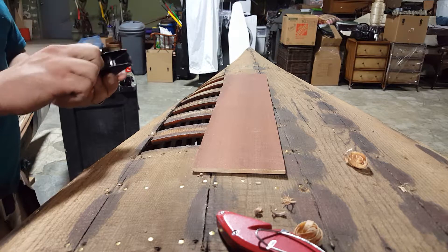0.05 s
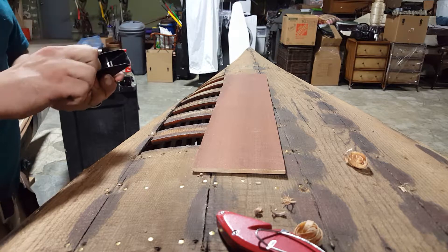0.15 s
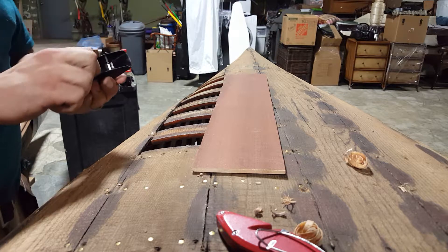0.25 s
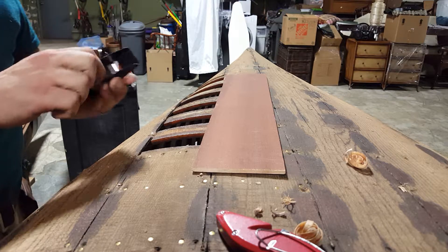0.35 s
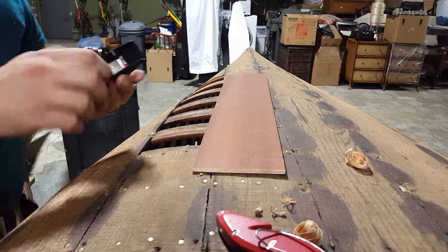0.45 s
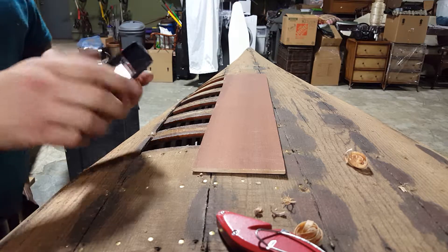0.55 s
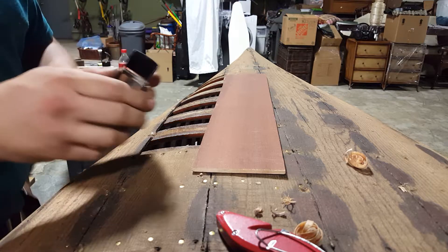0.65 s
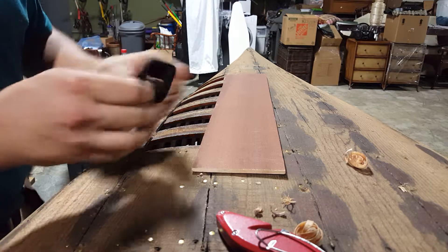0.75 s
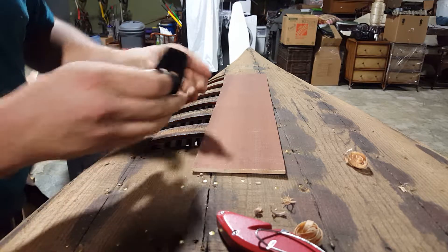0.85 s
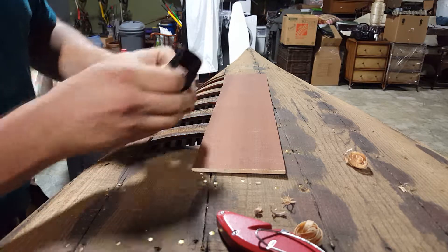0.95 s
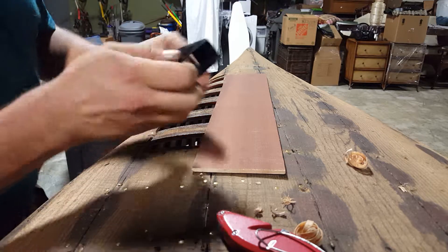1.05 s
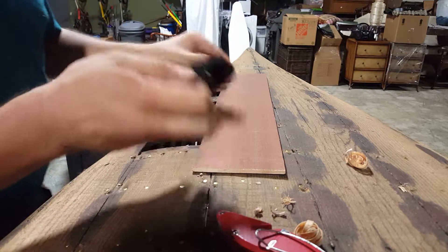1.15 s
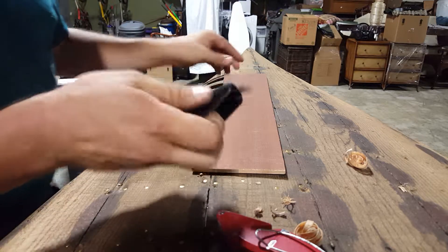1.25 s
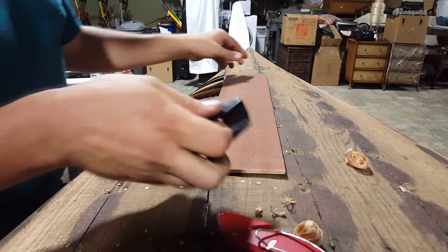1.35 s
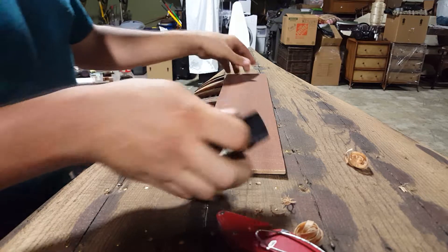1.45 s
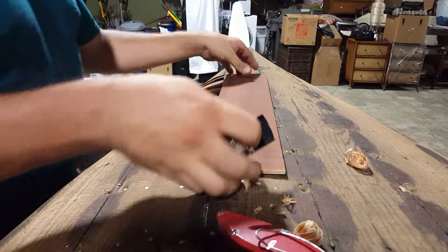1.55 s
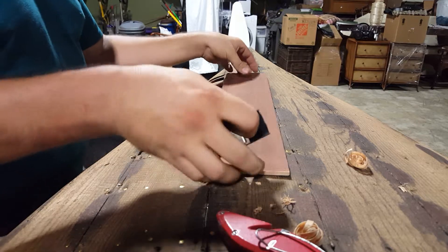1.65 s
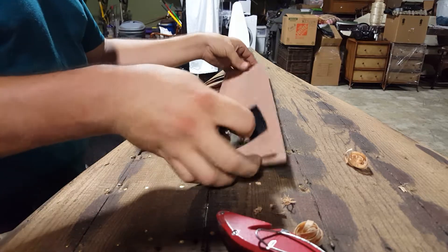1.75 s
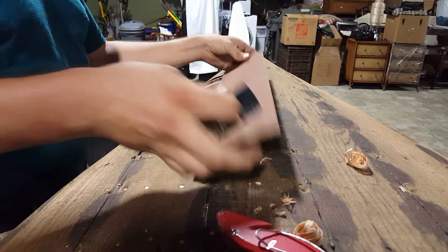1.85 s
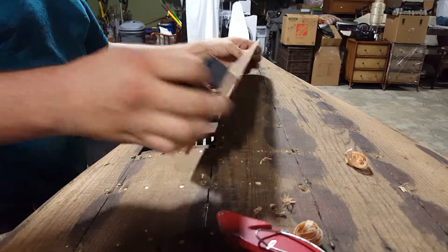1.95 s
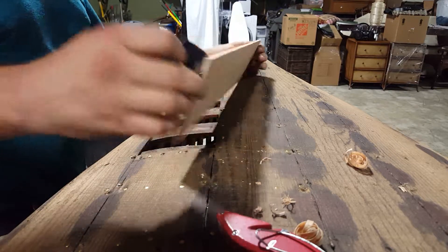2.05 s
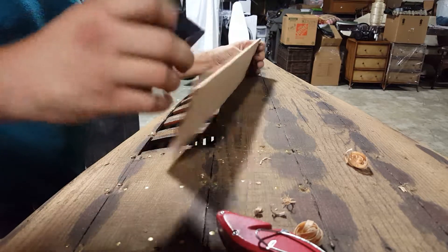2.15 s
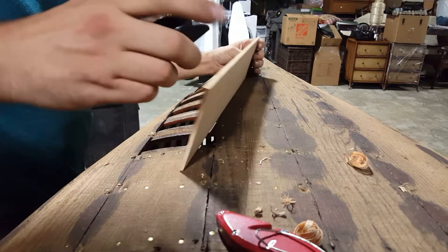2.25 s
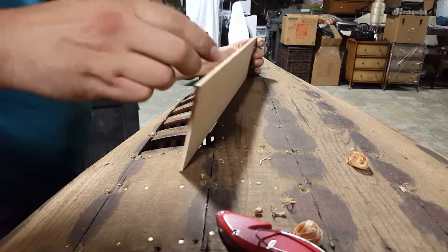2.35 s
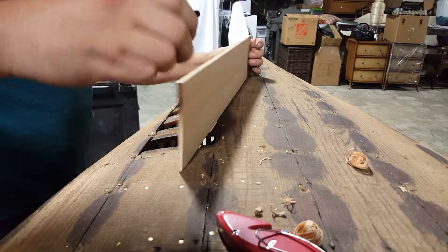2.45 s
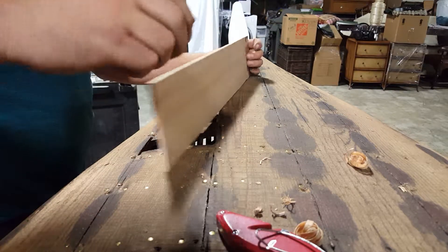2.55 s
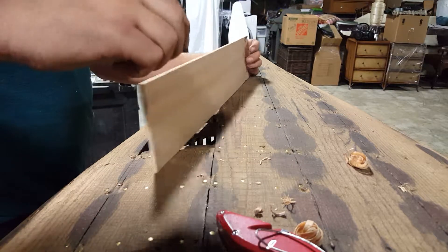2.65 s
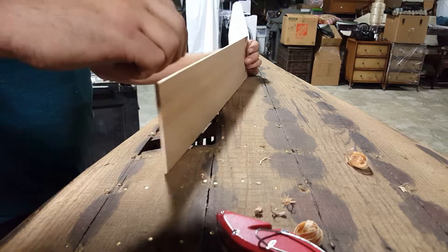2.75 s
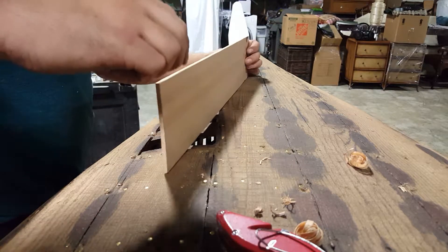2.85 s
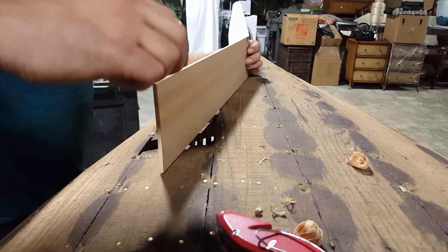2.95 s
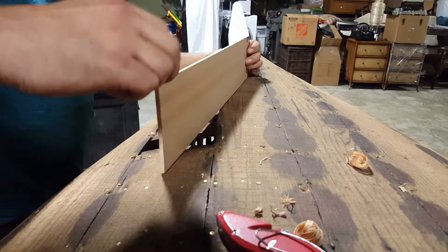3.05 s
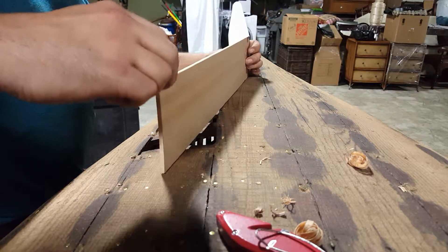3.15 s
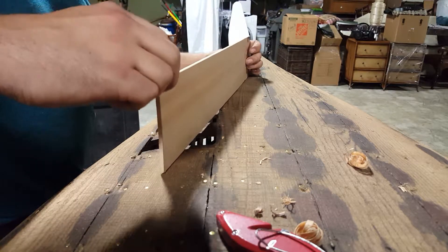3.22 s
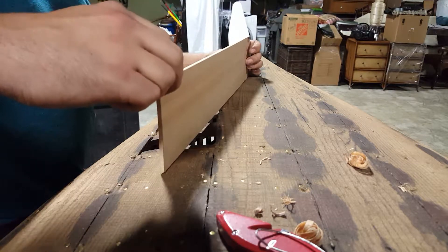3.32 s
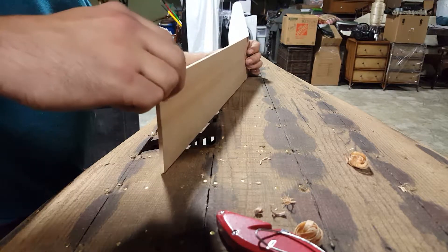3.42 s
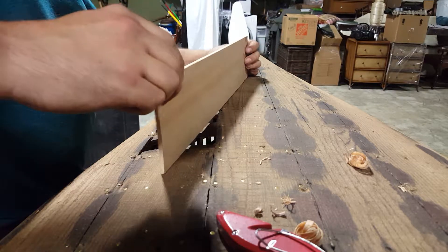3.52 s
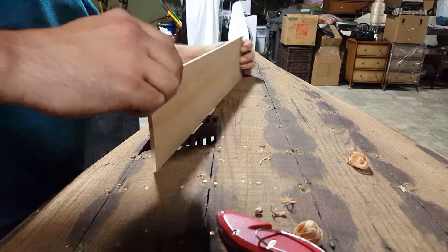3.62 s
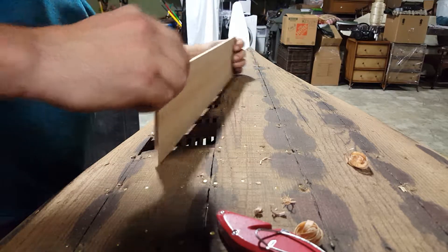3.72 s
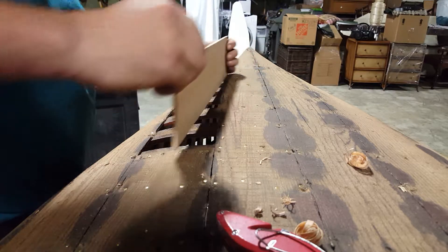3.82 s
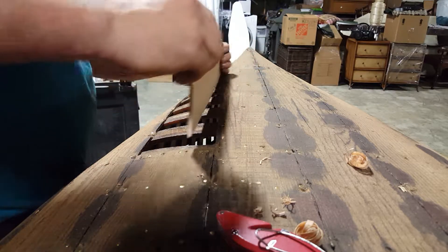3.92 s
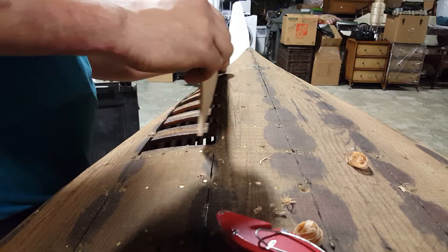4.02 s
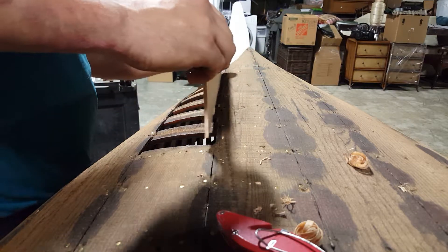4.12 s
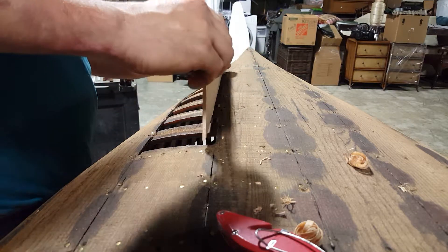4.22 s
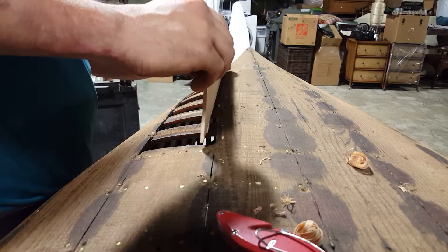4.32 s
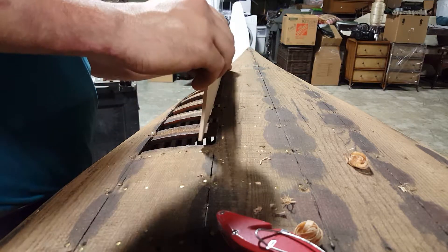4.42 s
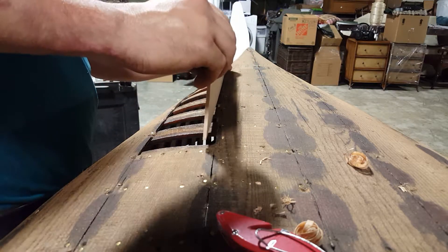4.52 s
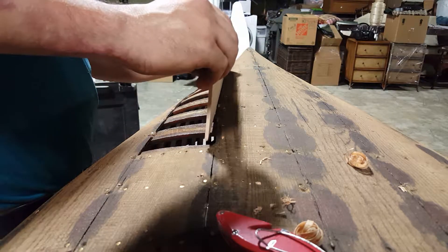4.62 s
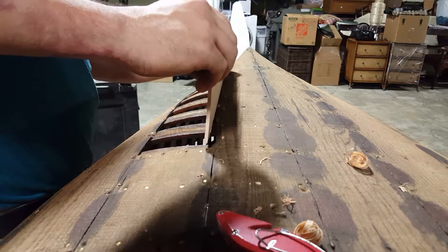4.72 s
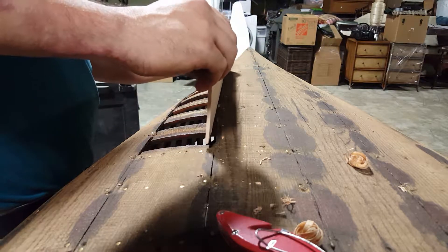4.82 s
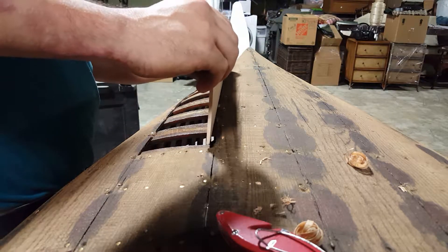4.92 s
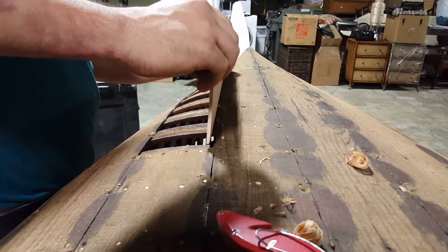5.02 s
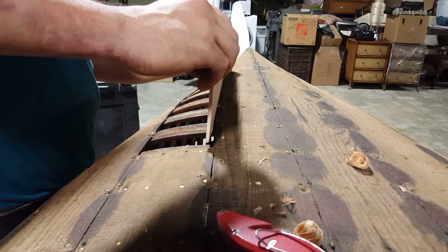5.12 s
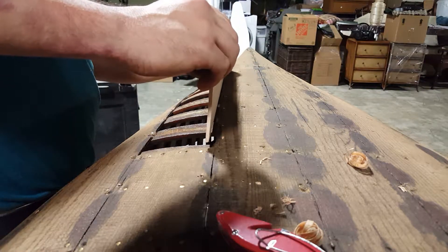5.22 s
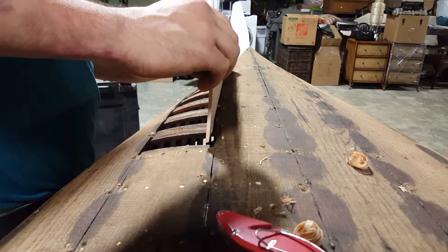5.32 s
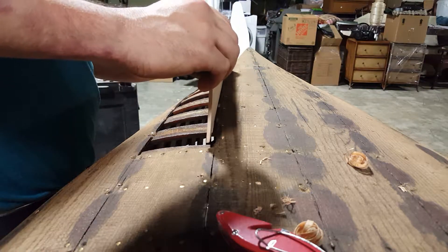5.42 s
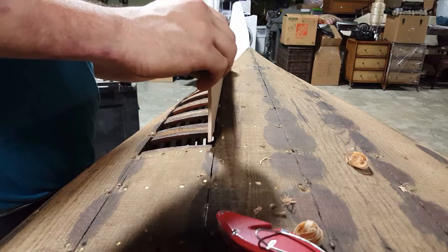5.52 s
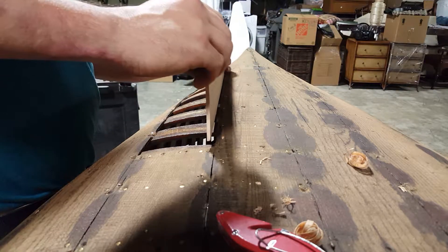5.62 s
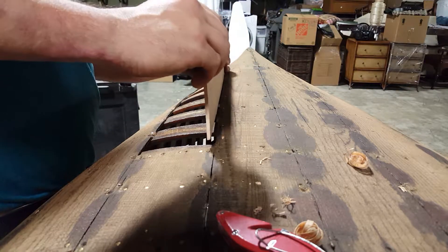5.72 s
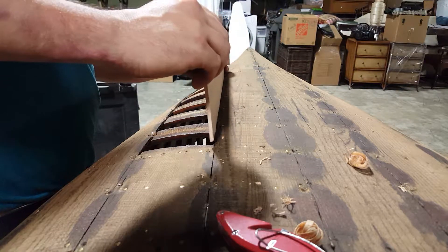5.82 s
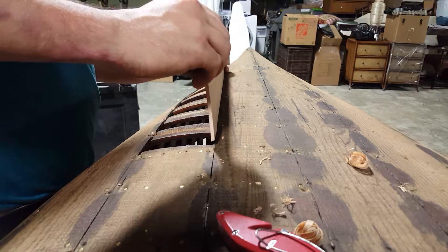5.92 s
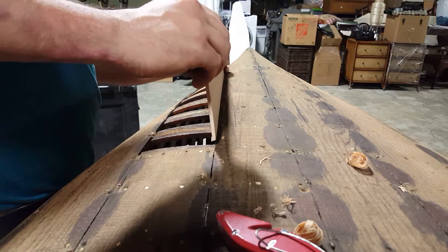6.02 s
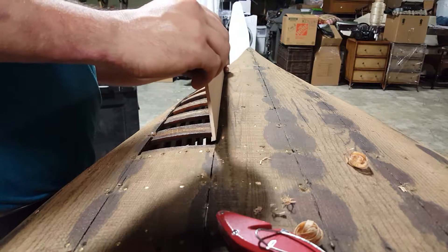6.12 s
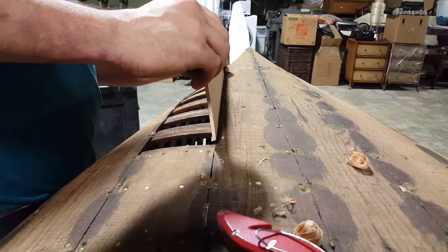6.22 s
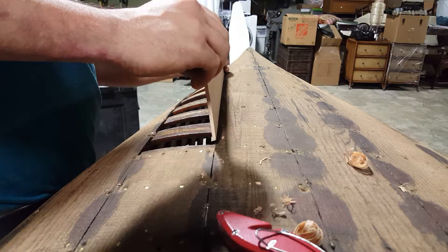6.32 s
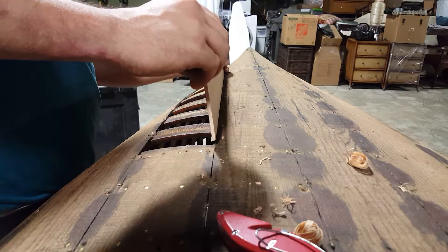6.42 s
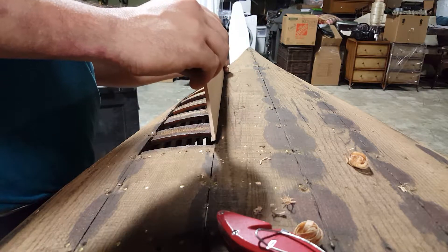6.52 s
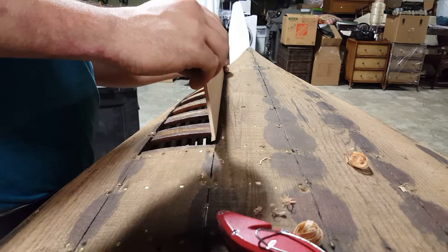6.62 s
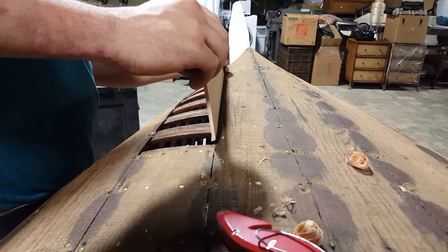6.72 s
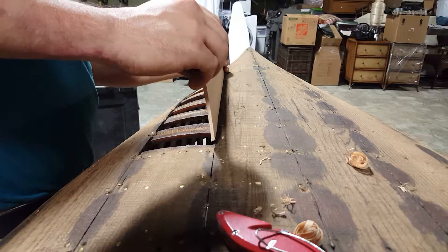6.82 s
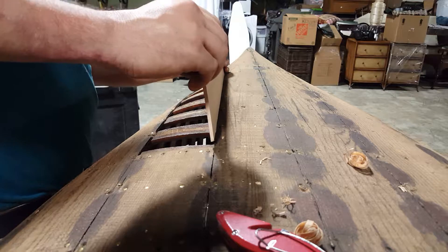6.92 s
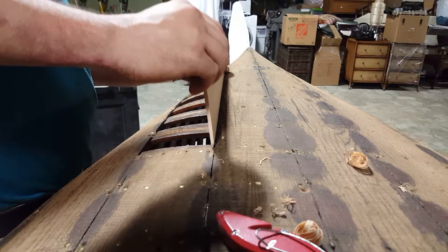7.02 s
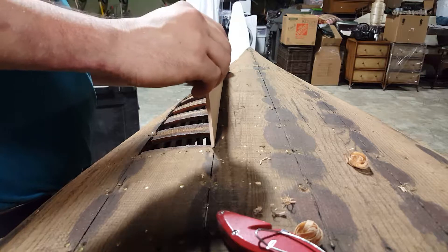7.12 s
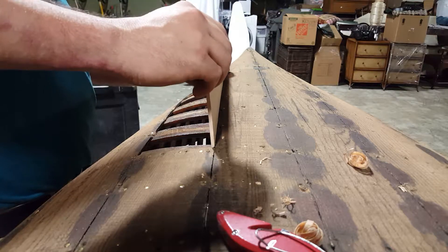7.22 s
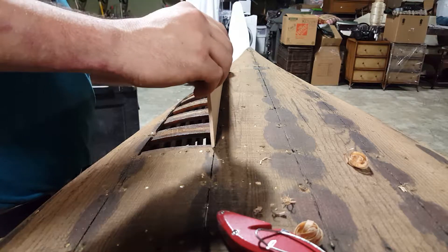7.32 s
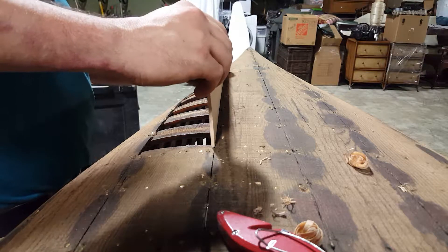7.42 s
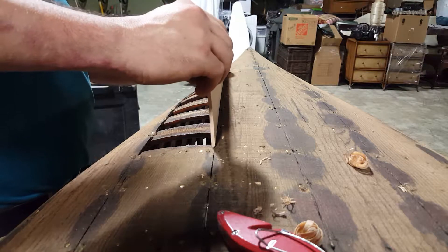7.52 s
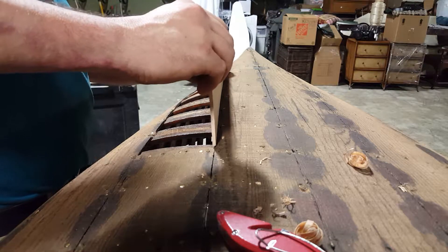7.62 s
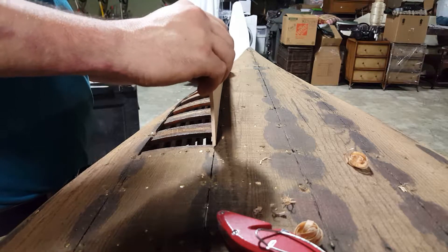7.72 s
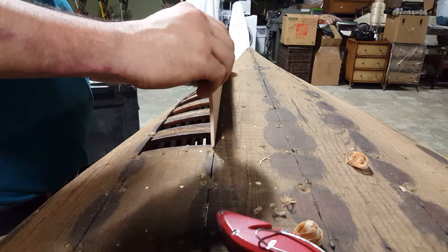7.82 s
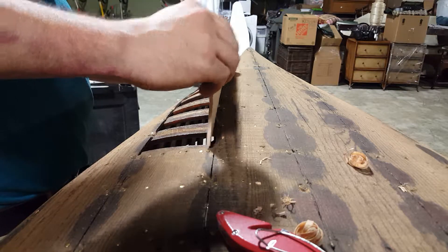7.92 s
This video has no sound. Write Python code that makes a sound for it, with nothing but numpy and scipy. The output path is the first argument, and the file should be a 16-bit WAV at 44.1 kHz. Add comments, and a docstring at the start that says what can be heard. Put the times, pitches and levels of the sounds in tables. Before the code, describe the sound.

Low room rumble and faint hiss in a workshop. A small metal tool chinks briefly, then a thin plank taps and rubs on an upturned wooden hull. Its corner snaps sharply, followed at once by a loud hollow double thump. Short scrapes and knocks follow as it is shuffled on edge, then long quiet gaps and a final hard clack. Close stereo microphone, short room echoes.

```python
"""In the soft rumble and hiss of a quiet workshop, a small metal tool in one hand chinks first.
Then a thin plank knocks and scrapes on an upturned wooden boat hull, and its corner snaps free as it is lifted.
It is stood on its edge and shuffled into place, and a sharp clack comes last.
Every knock and scrape drives the same wood: the hollow hull booms, the plank rings, its edge rasps
and the fibres hiss. The tool and the wood are heard with the echoes of the room."""
import sys
import numpy as np
from scipy import signal
from scipy.fft import rfft, irfft
from scipy.io import wavfile

SR = 44100
rng = np.random.default_rng(int(sys.argv[2]) if len(sys.argv) > 2 else 0)


def wrap_up_sound(samples):
    """Save the sound to the file named by the first command line argument, as 16-bit audio."""
    columns = np.atleast_2d(samples).T
    # keep every value between -1 and 1, then stretch to whole-number steps
    tamed = np.clip(columns, -1, 1)
    steps = np.round(tamed * 32767).astype(np.int16)
    wavfile.write(sys.argv[1], SR, steps)


N = 351036  # length of the scene in samples

# In all tables of ringing parts, level_db is relative and ring_s is the time to die away by 60 dB.
# still air of the shop, its balance of pitches: pitch_hz, relative level_db (per Hz)
AIR_SPECTRUM = [(25, -24.5), (40, -19.5), (58, -4.5), (92, -11.5), (120, -4), (145, -6.5), (180, -1),
                (255, -12), (335, -10), (440, -13.5), (590, -19.5), (780, -19.5), (1150, -24.5),
                (2000, -24.5), (4000, -34), (8000, -39.5), (11000, -41.5), (15000, -37.5)]
# how loud the still air is over time: time_s, rumble_db, hiss_db
AIR_LOUDNESS = [(0, -64, -71.5), (1.4, -63, -70), (3.1, -61, -71.5), (4.8, -60.5, -69.5), (7.96, -59, -71)]
AIR_SPLIT_HZ = 1036  # rumble below, hiss above
# sound from all sides, how alike left and right are: pitch_hz, likeness (1 = same, 0 = unrelated)
LEFT_RIGHT_LIKENESS = [(50, .75), (200, 0.73), (450, .65), (900, 0.062), (1600, 0.054), (3000, 0),
                       (15000, -0.25)]

# the metal tool: pitch_hz, level_db, ring_s
TOOL_MODES = [(2170, 4.5, 0.035), (2620, -12, .025), (2900, 4, .025), (3720, -5, 0.096), (4460, -2, 0.11),
              (5600, -8, .02), (6800, -11, .06), (7210, -12, .06), (8590, -9, .06), (11700, -15, .05),
              (14500, -7, .05)]
# the tool rattles once: a quick run of touches that swells and fades
RATTLE_START_S, RATTLE_PEAK_S, RATTLE_GAP_S = .762, .799, .0075
RATTLE_DB, RATTLE_FADE_DB_PER_S, RATTLE_UNEVEN_DB = -30.5, 330, 2

# workshop echoes, their colour: pitch_hz, relative level_db
ECHO_COLOUR = [(60, -3), (150, -4), (380, 3), (800, -3), (2500, -3), (5000, -6), (9000, 0), (15000, -13)]
# workshop echoes, the time they take to die away by 60 dB: pitch_hz, fade_s
ECHO_FADE = [(60, 0.65), (170, .85), (400, 0.41), (1000, 0.45), (3000, 0.38), (9000, 0.43), (15000, .2)]

# low modes of the hollow hull, before damping: pitch_hz, level_db, ring_s
HULL_MODES = [(66.5, -25, .3), (83, -16, 0.42), (98.4, -8, 0.3), (155.5, -0.5, 0.3), (186.8, -3.5, 0.23),
              (216.1, 0, 0.093), (231, 1.5, 0.1), (275, -1, 0.22), (317.5, 1, 0.14), (339.8, -1.5, 0.09),
              (380, 1, 0.11), (434.8, 0, 0.077)]
# bending modes of the plank, before damping: pitch_hz, level_db, ring_s
PLANK_MODES = [(444, -1.5, 0.092), (513, -4, .15), (556, -4, .14), (593, -4.5, 0.12), (656, -3, 0.16),
               (718, -9.5, 0.067), (762, -8.5, 0.11), (850, -10, .12), (912, -14.5, 0.18), (960, -15, .06),
               (1048, -15, 0.07), (1160, -14, 0.065), (1270, -16, 0.055), (1440, -12, .08),
               (1587, -8.5, .04)]
# resonances of the plank's edge, before damping: pitch_hz, level_db, ring_s
EDGE_MODES = [(937, -11, 0.011), (1173.4, -8.5, 0.017), (1420, -6, 0.0086), (1620, -5, 0.01),
              (1975, -6, .02), (2190, -5, 0.012), (2430, -5, .016), (2768, 2, 0.0092), (2980, -1.5, 0.007),
              (3300, -1, 0.012), (3700, -4, 0.012), (3903, -3, 0.011), (4200, -6.5, .011),
              (4604, -6.5, 0.0094), (4970, -11.5, 0.0033)]
# heavily damped resonances of the fibres at the contact: pitch_hz, level_db, ring_s
FIBRE_MODES = [(4030, 3, 0.0055), (4830, 1.5, 0.0021), (5800, 0.5, .003), (6840, -4.5, 0.0037),
               (7600, -7, 0.0027), (8600, -10, 0.0054)]
# the plank knocks on the hull: start_s, strength_db, hardness_db, fibres against edge_db
PLANK_KNOCKS = [(1.23, -33.5, -7.5, -0.5), (1.534, -29, -24.5, -18), (1.7544, -34.5, -8, 0),
                (1.849, -32, 11.5, -7.5), (2.075, -32.5, 17.5, -11), (2.1024, -13.5, -10.5, -27),
                (2.2173, 6, -23.5, -20), (2.2225, 0.5, -9.5, -21), (2.2687, -11, -23.5, -13),
                (2.297, -28, -29, -4), (2.5604, -27, 8.5, -9.5), (2.5892, -23.5, -0.5, -13),
                (3.6267, -29, 7, -13), (3.732, -19.5, 17, -13.5), (3.7644, -16.5, -4, -7),
                (4.171, -22.5, -30, -1.5), (5.678, -28, -5.5, -8), (5.784, -26.5, -23, -21),
                (7.564, -23, -11.5, -7), (7.8786, -2.5, 1, -1)]
# the plank is pushed along the hull: loudest_s, rise_s, fall_s, strength_db, hardness_db, fibres against edge_db
PLANK_SCRAPES = [(1.586, 0.022, 0.017, -49, -11.5, -17), (1.656, 0.023, 0.026, -49, -11.5, -9.5),
                 (1.767, 0.015, 0.0091, -51, 0, -13.5), (1.95, .069, 0.14, -61, 7.5, -11),
                 (2.16, 0.021, 0.022, -42.5, 3.5, -12.5), (2.264, 0.03, .034, -36, -10, -15),
                 (2.44, 0.23, 0.13, -51.5, -8, -12), (2.606, 0.018, 0.057, -44, -2.5, -15),
                 (2.755, 0.054, 0.03, -48.5, 7.5, -18.5), (3.54, 0.034, .07, -62, 5, -4.5),
                 (3.681, 0.033, 0.037, -35, 1.5, -15), (4.15, .11, 0.066, -67, 19, -6.5),
                 (4.53, .013, 0.014, -50.5, 9.5, -13), (4.551, 0.0081, 0.014, -46, -11, -12),
                 (7.058, 0.03, .02, -57.5, -4.5, -15.5), (7.101, 0.02, 0.0076, -51, -6, -10.5),
                 (7.828, 0.014, 0.016, -52.5, -18, -7.5)]
# a hard contact drives the small, stiff parts, a soft one the hull;
# dB per dB of hardness for: hull, plank, edge, fibres
HARDNESS_EFFECT = (-.5, -.2, .5, .48)
# the edge swings to the right as the plank is raised, and back as it is lined up:
# time_s, left over right_db
EDGE_PLACE = [(1.6, -2), (2.15, -7), (2.7, -11), (3.7, -10), (4.1, -1), (5.7, 0.5), (7.9, -4.5)]
# how freely the hands let the plank ring, loosest as it drops on its edge and is slid into line:
# time_s, level_db
HAND_FREEDOM = [(1.65, -9), (2.1, -3), (2.4, 4), (2.6, -11.5), (2.75, 3.5), (3.7, -6), (4.53, 7),
                (5.7, -7.5), (7.1, -2.5), (7.88, -9.5)]
SCRAPE_RING_DB = -6  # sliding rings the plank less than a blow does
# after each knock the plank skids briefly; a harder blow skids only somewhat louder
SKID_DB, SKID_FIBRES_DB = -44.5, -12
SKID_FOLLOWS = .62  # dB of skid strength or hardness per dB of the knock's
SKID_DELAY_S, SKID_RISE_S, SKID_FALL_S = .014, .0054, .022

# the plank held free, flicked at its corner: pitch_hz, level_db, ring_s
CORNER_MODES = [(520, -19, 0.061), (696, -22.5, 0.05), (1069, -19, 0.04), (1370, -12.5, 0.028),
                (1667, -13, 0.04), (2150, -5.5, 0.027), (2520, -0.5, 0.017), (2700, -7.5, .02),
                (2890, -6, .026), (3150, -9.5, 0.019), (3540, -10.5, 0.019), (3835, -14.5, 0.016),
                (5024, -14, .014), (5720, -9, .012), (6500, -7, .01), (8196, -4, .008)]
# the corner snaps free as the plank is lifted: start_s, level_db
CORNER_SNAPS = [(1.9748, -6), (1.9775, 0), (1.9812, -15.5)]

CUTOFF_HZ = 15900  # top of the finished sound


def from_db(db):
    """Turn decibels into a gain."""
    return 10 ** (np.asarray(db) / 20)


def rms_one(x):
    """Scale so that the average power is 1."""
    return x / np.sqrt(np.mean(x ** 2) + 1e-20)


def energy_one(response):
    """Scale a stereo response so that its energy per side averages 1."""
    return response / np.sqrt(np.sum(response ** 2) / 2)


def at_hz(points, hz):
    """Read a table at any pitch, in straight lines along log frequency."""
    pitch_hz, value = np.transpose(points)
    return np.interp(np.log(np.maximum(hz, 1)), np.log(pitch_hz), value)


def cut(x, hz, kind, order=2):
    """Butterworth filter: "low" keeps what lies below hz, "high" what lies above."""
    sections = signal.butter(order, min(hz, SR / 2 - 1000), kind, fs=SR, output="sos")
    return signal.sosfilt(sections, x)


def panned(left_db):
    """Left and right gains, left_db apart, with the same total power at any setting."""
    gains = from_db(np.array([[.5], [-.5]]) * left_db)
    return rms_one(gains)


def through(x, response):
    """Let every moment of a signal set off the response of a part or room."""
    return signal.oaconvolve(np.atleast_2d(x), response, axes=1)[:, :N]


def clicks(times, levels_db):
    """One impulse for each contact."""
    out = np.zeros(N)
    out[np.round(np.asarray(times) * SR).astype(int)] = from_db(levels_db)
    return out


def wander(per_s):
    """A random course around 0 that takes per_s new turning values a second."""
    turns = rng.standard_normal(N // 100)
    return np.interp(np.arange(N) / SR * per_s, np.arange(len(turns)), turns)


def diffuse(spectrum, size):
    """Stereo noise arriving from all sides: alike in the bass, unrelated in the treble."""
    hz = np.fft.rfftfreq(size, 1 / SR)
    mid, side = rfft(rng.standard_normal((2, size)))
    alike = np.clip(at_hz(LEFT_RIGHT_LIKENESS, hz), -1, 1)
    shared = np.sqrt(1 + alike) * mid
    opposed = np.sqrt(1 - alike) * side * [[1], [-1]]
    return irfft((shared + opposed) * from_db(at_hz(spectrum, hz)), size)


def body(modes, low_hz, high_hz, spread, turn, order=4):
    """Response of a struck part: a sum of dying tones. Waves take time to cross it, so each mode lags
    the last by `turn` radians; left and right differ by a random phase of about `spread` radians."""
    longest_s = max(ring_s for hz, db, ring_s in modes)
    t = np.arange(int(SR * longest_s) + SR // 100) / SR
    out = 0
    for k, (hz, db, ring_s) in enumerate(modes):
        apart = spread * rng.standard_normal() * np.array([[.5], [-.5]])
        fade = np.exp(-np.log(1000) * t / ring_s)
        out = out + from_db(db) * fade * np.cos(2 * np.pi * hz * t - k * turn + apart)
    return energy_one(cut(cut(out, low_hz, "high"), high_hz, "low", order=order))


def shop_air():
    """The still air: noise split into a soft rumble and a faint hiss, each with its own slow level."""
    time_s, *levels_db = np.transpose(AIR_LOUDNESS)
    rumble, hiss = [from_db(np.interp(np.arange(N) / SR, time_s, db)) for db in levels_db]
    low = cut(diffuse(AIR_SPECTRUM, size=N), AIR_SPLIT_HZ, "low", order=3)
    high = cut(diffuse(AIR_SPECTRUM, size=N), AIR_SPLIT_HZ, "high", order=3)
    return rumble * rms_one(low) + hiss * rms_one(high)


def tool_chink(count=8):
    """Metal parts rattle as the tool turns in the hand; each touch sets off the metal's ringing."""
    jitter = rng.uniform(-0.54, .5, count)  # in gaps
    times = RATTLE_START_S + RATTLE_GAP_S * (np.arange(count) + jitter)
    swell_db = RATTLE_DB - RATTLE_FADE_DB_PER_S * np.abs(times - RATTLE_PEAK_S)
    touches = clicks(times, swell_db + RATTLE_UNEVEN_DB * rng.standard_normal(count))
    metal = body(TOOL_MODES, low_hz=1800, high_hz=15000, spread=2.6, turn=2.9)
    return through(touches, metal) * panned(2.3)


def workshop(x, near_db, near_t60, far_db):
    """Quick scatter from the hull, arms and clutter, then the room's tail, dying band by band."""
    t = np.arange(SR) / SR
    noise = rfft(diffuse(ECHO_COLOUR, size=SR))
    tail = 0
    centres_hz = np.geomspace(60, 15000, 9)
    for hz, share in zip(centres_hz, np.eye(len(centres_hz))):
        # each band fades into its neighbours
        weight = at_hz(np.c_[centres_hz, share], np.fft.rfftfreq(SR, 1 / SR))
        band = irfft(noise * weight, SR)
        rate = np.log(1000) / at_hz(ECHO_FADE, hz)
        tail = tail + band * np.exp(-rate * t) * np.sqrt(2 * rate / SR)
    tail = tail * (1 - np.exp(-t / 0.03))  # the tail builds up gradually
    near_fade = np.exp(-np.log(1000) * t / near_t60)
    scatter = cut(diffuse(ECHO_COLOUR, size=SR) * near_fade, 530, "high")
    return through(x, from_db(near_db) * energy_one(scatter) + from_db(far_db) * tail)


def plank_on_hull():
    """Knocks let the wood ring freely; friction plays it while the hand bears down."""
    blows = [impacts(part) for part in range(len(HARDNESS_EFFECT))]
    slips = [rms_one(friction(per_s=4500, uneven_db=3.0, catch_db=3.0, path_s=.0006)) for part in blows]
    # the heavy hull follows mostly the slow slips; the light plank takes up the quick ones
    slips[0] = cut(slips[0], 470, "low", order=1)
    quick = cut(slips[1], 1100, "high", order=1)
    slips[1] = from_db(0.5) * slips[1] + from_db(2.5) * quick
    rubs = [slip * pressure(part) for part, slip in enumerate(slips)]
    # the finest fibres crackle far above their resonances (1e-18 keeps the filter off extremely tiny numbers)
    rub_crackle = from_db(-12) * cut(rubs[-1] + 1e-18, 9000, "high")
    blow_crackle = from_db(-28) * cut(blows[-1] + 1e-18, 9000, "high")
    responses = wood_parts(damping=0.96) + wood_parts(damping=3.0)  # for blows, then for rubs
    wood = sum(map(through, blows + rubs, responses))
    # the open hull radiates no deep bass
    return rub_crackle + blow_crackle + cut(wood, 46, "high")


def impacts(part):
    """Stereo impulses of all knocks on one part of the wood."""
    out = np.zeros((2, N))
    for s, *contact in PLANK_KNOCKS:
        level_db = part_levels(s, *contact, 0)[part]
        out[:, [round(s * SR)]] += from_db(level_db) * placed(part, s)
    return out


def part_levels(s, db, hardness_db, fibres_db, ring_db):
    """Share one contact among hull, plank, edge and fibres (dB), by its hardness and the hands' hold."""
    plank_db = ring_db + np.interp(s, *np.transpose(HAND_FREEDOM))
    return db + np.array(HARDNESS_EFFECT) * hardness_db + np.array([0, plank_db, 0, fibres_db])


def placed(part, s):
    """Left and right gains of a part's drive at one moment; only the edge (part 2) moves."""
    return panned(np.interp(s, *np.transpose(EDGE_PLACE)) if part == 2 else 0)


def wood_parts(damping):
    """Responses of hull, plank, edge and fibres; more damping shortens the rings of the first three."""
    hull, plank = [np.array(modes) / [1, 1, damping] for modes in (HULL_MODES, PLANK_MODES)]
    edge = np.array(EDGE_MODES) / [1, 1, damping ** .7]
    fibres = FIBRE_MODES
    return [body(hull, low_hz=62, high_hz=583, spread=0.99, turn=.08),
            body(plank, low_hz=332, high_hz=1860, spread=1.0, turn=.6),
            body(edge, low_hz=804, high_hz=5473, spread=1.7, turn=2.52),
            body(fibres, low_hz=3400, high_hz=9016, spread=2.5, turn=2.4, order=7) * panned(4.4)]


def friction(per_s, uneven_db, catch_db, path_s):
    """Fibres catch and let go: a dense train of small uneven slips that come in clumps."""
    slips = np.zeros(N)
    at = np.flatnonzero(rng.random(N) < per_s / SR)
    sizes_db = uneven_db * np.minimum(rng.exponential(1, len(at)), 4)
    slips[at] = rng.choice([-1, 1], len(at)) * from_db(sizes_db)
    slips = slips * from_db(catch_db * wander(per_s=110))
    # each slip also returns from the plank's end; as the contact travels, the colour shifts
    lag = (path_s * SR * from_db(3 * wander(per_s=9))).astype(int)
    returned = slips[np.maximum(np.arange(N) - lag, 0)]
    return slips + 0.46 * returned


def strokes():
    """All sliding, the scrapes and the skid after each knock, as (s, rise s, fall s, dB on each part)."""
    skids = [(s + SKID_DELAY_S, SKID_RISE_S, SKID_FALL_S,
              SKID_DB + SKID_FOLLOWS * db, SKID_FOLLOWS * hardness, SKID_FIBRES_DB)
             for s, db, hardness, fibres in PLANK_KNOCKS]
    return [(s, rise, fall, part_levels(s, *contact, SCRAPE_RING_DB))
            for s, rise, fall, *contact in PLANK_SCRAPES + skids]


def pressure(part):
    """Stereo force of all sliding on one part of the wood; each stroke swells and lets go."""
    t = np.arange(N) / SR
    power = np.zeros((2, N))
    for s, rise, fall, levels_db in strokes():
        # each stroke acts only within a third of a second of its loudest moment
        near = slice(max(int(s * SR) - SR // 3, 0), int(s * SR) + SR // 3)
        width = np.where(t[near] < s, rise, fall)
        swell = np.exp(-.5 * ((t[near] - s) / width) ** 2)
        power[:, near] += (from_db(levels_db[part]) * swell * placed(part, s)) ** 2
    return np.sqrt(power)


def corner_snap():
    """A hard triple contact rings the modes of the plank's corner, off to the right."""
    contacts = clicks(*np.transpose(CORNER_SNAPS))
    corner = body(CORNER_MODES, low_hz=450, high_hz=3840, spread=1.0, turn=0.062, order=5)
    return through(contacts, corner) * panned(-6.0)


def scene():
    """The air, the tool, the wood and the room around them."""
    air = shop_air()
    tool_and_wood = tool_chink() + plank_on_hull()
    snap = corner_snap()
    echoes = workshop(tool_and_wood, near_db=-7.0, near_t60=0.045, far_db=-12.0)
    snap_echoes = workshop(snap, near_db=-8, near_t60=0.018, far_db=-15)
    return air + tool_and_wood + snap + echoes + snap_echoes


def record(dry):
    """Full scale limits the peaks, and a steep filter cuts the top."""
    limited = np.clip(dry, -1, 1)
    return signal.sosfilt(signal.ellip(10, .1, 70, CUTOFF_HZ, fs=SR, output="sos"), limited)


dry = scene()
out = record(dry)
wrap_up_sound(out)
```